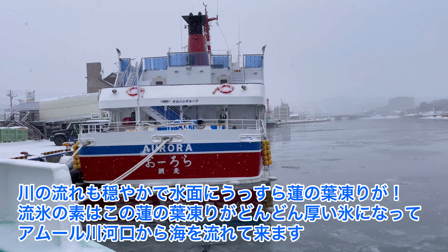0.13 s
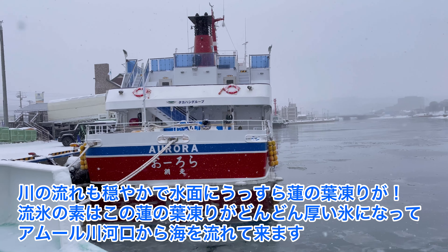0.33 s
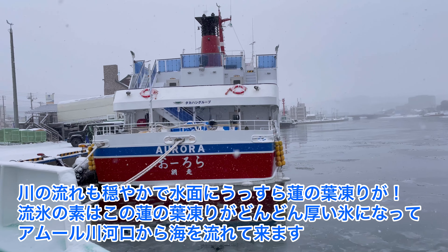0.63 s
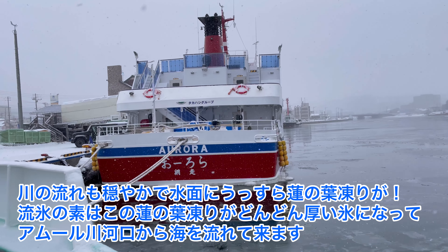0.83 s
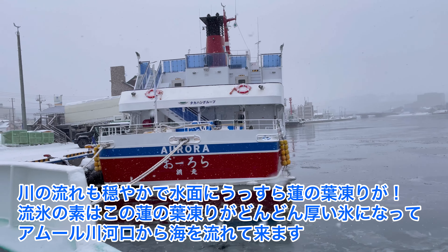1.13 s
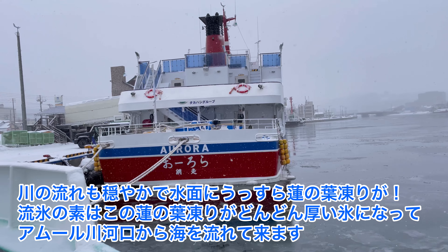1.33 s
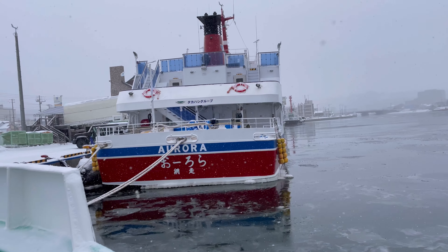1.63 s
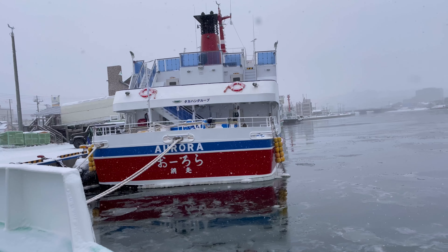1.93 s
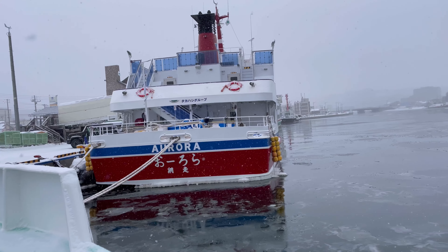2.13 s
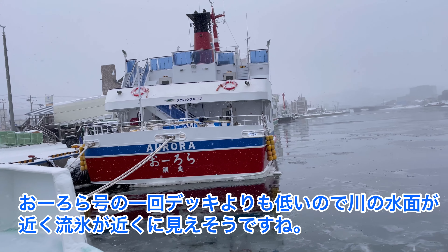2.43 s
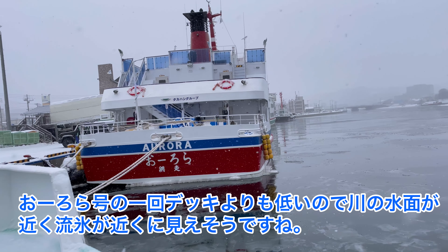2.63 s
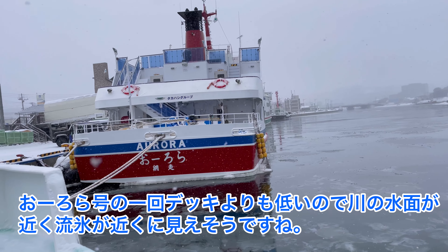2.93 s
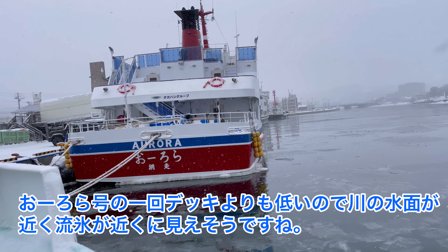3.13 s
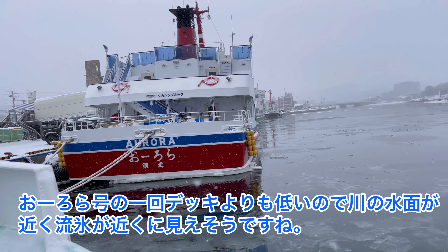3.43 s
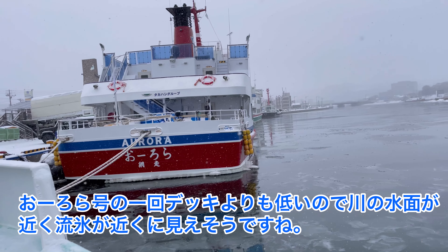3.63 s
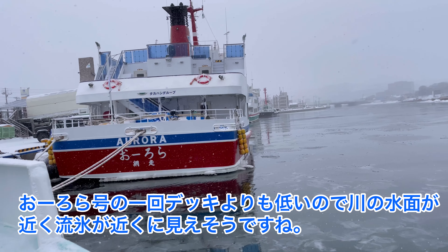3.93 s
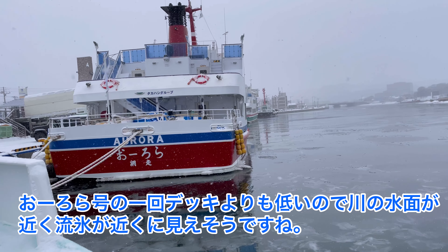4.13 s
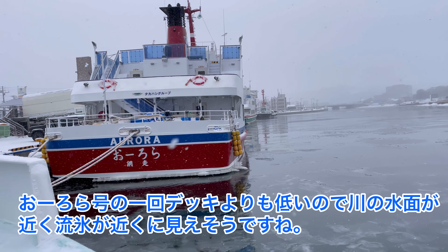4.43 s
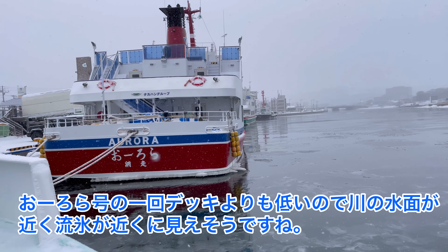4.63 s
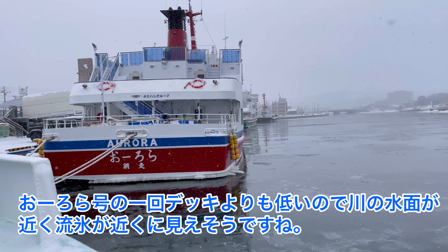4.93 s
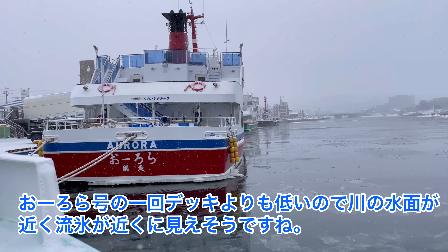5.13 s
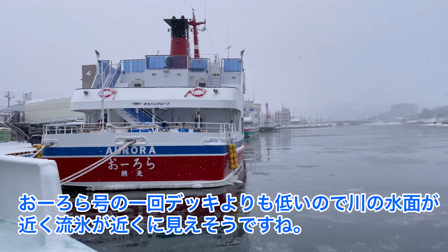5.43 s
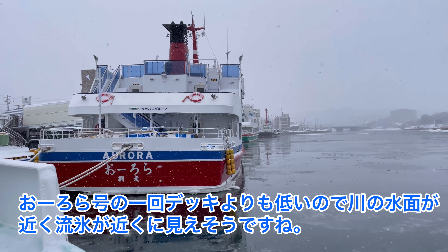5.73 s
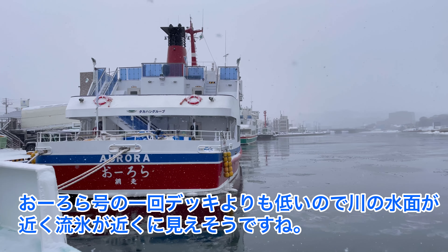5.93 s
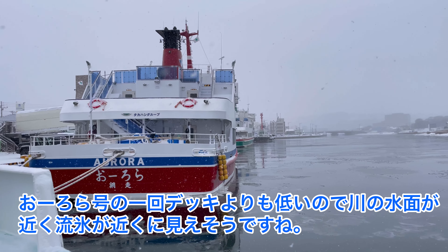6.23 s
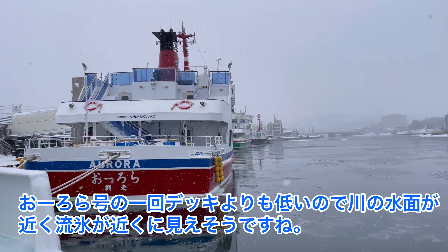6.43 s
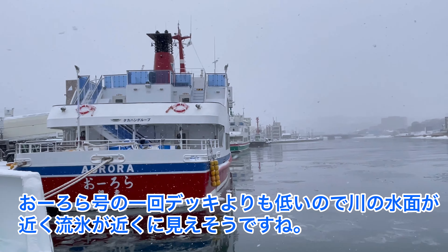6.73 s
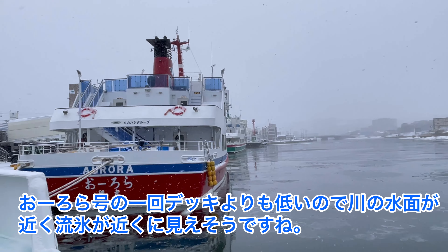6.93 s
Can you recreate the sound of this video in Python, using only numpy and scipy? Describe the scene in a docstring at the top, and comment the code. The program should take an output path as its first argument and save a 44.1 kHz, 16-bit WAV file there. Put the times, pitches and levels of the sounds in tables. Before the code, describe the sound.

A ship's diesel drones loud and low under a broad rushing roar of exhaust and wash, with wavering whines and tiny metallic ticks.

```python
"""A diesel fires evenly under the open deck of a ship under way, among blower hum, droning ducts and wind.
Exhaust roar and wash are coloured noise that swells in short surges and sets hull and pipes singing.
A low whine of the blower wavers as a tone; higher whines are narrow bands of noise. A loose metal
fitting rings its modes when knocked; wind is lumpy low noise. All reaches a microphone with two ports,
which share sounds to a degree that depends on pitch.
"""
import sys
import numpy as np
from scipy import signal
from scipy.fft import rfft, irfft, next_fast_len
from scipy.io import wavfile

SR = 44100
rng = np.random.default_rng(int(sys.argv[2]) if len(sys.argv) > 2 else 0)


def generate_wav(sig):
    """Save sig (samples, or channels by samples) to the path in sys.argv[1] as 16-bit PCM at SR."""
    pcm = np.round(np.clip(np.atleast_2d(sig).T, -1, 1) * 32767).astype(np.int16)
    wavfile.write(sys.argv[1], SR, pcm)


N = 312669   # length in samples
# All levels in dB are relative: trims, port gaps and the microphone's gain come on top.


def amp(db):
    """dB to gain."""
    return 10 ** (np.asarray(db) / 20)


def rms_one(x):
    """Scale to rms 1."""
    return x / np.sqrt(np.mean(x ** 2) + 1e-20)


def in_time(rows):
    """Columns of a curve in time, one value a sample."""
    start_s, *columns = np.transpose(rows)
    return [np.interp(np.arange(N) / SR, start_s, column) for column in columns]


def at_hz(rows, hz):
    """Columns of a spectrum table, read on a log-frequency axis."""
    table_hz, *columns = np.transpose(rows)
    return [np.interp(np.log(hz + 1), np.log(table_hz), column) for column in columns]


def drift(rate_hz):
    """Slow random wander of spread 1: noise at every 40th sample, twice low-passed."""
    r = np.exp(-80 * np.pi * rate_hz / SR)
    noise = rng.standard_normal(N // 40 + 2002)
    slow = signal.lfilter([1], [1, -2 * r, r * r], noise)[2000:]   # drop the run-in
    return np.interp(np.arange(N) / 40, np.arange(len(slow)), rms_one(slow - slow.mean()))


def turns(hz):
    """Running phase in radians of a frequency curve, from a random start."""
    return 2 * np.pi * (np.cumsum(hz) / SR + rng.random())


def band_noise(noise, low_hz, high_hz):
    """Noise through a gentle band-pass."""
    return signal.sosfilt(signal.butter(2, [low_hz, high_hz], "band", fs=SR, output="sos"), noise)


# The microphone's two ports: pitch_hz, likeness (0-1), left_over_right_db
PORT_MATCH = [(40, 0.8, 0.5), (120, 0.7, 6), (213, 0.63, 3.5), (293, 0.77, 1.5), (387, 0.32, 3),
              (540, 0.58, 5), (975, 0.42, 5.5), (1500, 0.02, 5.5), (1830, 0.24, 4), (2440, 0.37, 6.5),
              (3800, 1, 4), (4500, 0.02, 8), (5460, 0.2, 9.5), (7550, 0.7, -0.5), (7600, 1, 3.5),
              (9570, 1, -1.5), (10800, 0.02, 2), (12600, 0.7, -1.5)]
# Phase between the ports: pitch_hz, left_lead_rad
PORT_LEAD = [(0, 0), (260, 0.3), (690, 2.0), (950, 2.3), (1550, 2.5), (1810, -0.4), (2150, 0.2),
             (2500, 0.7), (3620, 1.2), (4390, 1.1), (4650, 1.3), (5340, 0.8), (5680, -1.4), (7240, -1.9),
             (7670, -3.0), (9560, -3.3), (11600, -5.3), (12000, -6.0), (12500, -6.3), (14600, -6.3)]


def ports(direct, field):
    """The right port hears direct sound shifted in phase and level, and shares only part of the noise field."""
    size = next_fast_len(N + 4096)
    hz = np.arange(size // 2 + 1) * SR / size
    alike, gap_db = at_hz(PORT_MATCH, hz)
    alike = np.clip(alike, 0, 1)
    lead_rad = np.interp(hz, *np.transpose(PORT_LEAD))
    near, far = rfft(field, size)
    shared = np.exp(-1j * lead_rad) * (rfft(direct, size) + alike * near)
    right = amp(-gap_db) * (shared + np.sqrt(1 - alike ** 2) * far)
    return np.array([direct + field[0], irfft(right, size)[:N]])


ROAR_DB = -26   # at the mean surge
# Roar below this pitch follows the rumble curve, by this share
RUMBLE_TOP_HZ, RUMBLE_FOLLOWS = 760, 0.82
SURGE_FLICKER_DB, SPRAY_FLICKER_DB, FLICKER_RATE_HZ = 0.55, 1.1, 15
# Surges of exhaust and wash, used as swings about the mean: start_s, upper_middle_db, treble_spray_db
SURGES = [(0.0, -40, -63), (0.86, -39.5, -62), (0.95, -37.5, -59.5), (1.06, -38.5, -62),
          (1.13, -39.5, -59.5), (1.3, -39, -60.5), (1.45, -39.5, -62.5), (1.54, -40.5, -62.5),
          (1.62, -39, -62.5), (2.13, -41.5, -63.5), (2.22, -37, -60.5), (2.4, -40, -61.5),
          (2.51, -37.5, -59.5), (2.66, -40, -65.5), (2.95, -39.5, -60), (3.27, -39.5, -63.5),
          (3.37, -39.5, -63.5), (3.52, -41, -63.5), (3.6, -39, -60), (3.69, -38, -63), (3.77, -37, -61),
          (3.88, -38, -60.5), (4.05, -40, -62), (4.14, -36, -59), (4.23, -40, -64.5), (4.51, -39.5, -63),
          (4.6, -42.5, -68), (4.77, -40, -62), (5.3, -39.5, -63.5), (5.37, -38.5, -63), (5.45, -39.5, -64),
          (5.54, -41.5, -65), (5.6, -37, -60.5), (5.71, -36, -57), (5.76, -39, -64), (6.05, -41, -64.5),
          (6.25, -40.5, -63.5), (6.33, -38.5, -59.5), (6.45, -40, -62.5), (6.78, -41.5, -63.5),
          (6.88, -38.5, -59), (6.96, -42, -65), (7.02, -40, -61.5)]
# Rumble in the low middle, used as swings about the mean: start_s, level_db
RUMBLE_CURVE = [(0.0, -22.5), (1.0, -22), (1.15, -20), (1.33, -21), (1.51, -23), (2.32, -22), (2.41, -25.5),
                (2.51, -18), (2.63, -25), (3.16, -19.5), (3.38, -24.5), (3.42, -19), (3.61, -24),
                (3.63, -18.5), (3.83, -20), (4.77, -23.5), (4.93, -18), (4.97, -22), (5.52, -21.5),
                (5.54, -27.5), (5.65, -15), (5.77, -22), (6.18, -24), (6.24, -20), (6.81, -25),
                (6.87, -21.5), (6.99, -22.5), (7.05, -22)]


def surges():
    """Swell of the upper middle, and the levels of rumble and spray; one fast flicker moves surge and spray."""
    surge_db, spray_db = in_time(SURGES)
    flicker = drift(FLICKER_RATE_HZ)
    surge_db = surge_db - surge_db.mean() + SURGE_FLICKER_DB * flicker
    spray_db = spray_db + SPRAY_FLICKER_DB * flicker
    rumble_db, = in_time(RUMBLE_CURVE)
    rumble_db = ROAR_DB + RUMBLE_FOLLOWS * (rumble_db - rumble_db.mean())
    return surge_db, rumble_db, spray_db


# Colour of the exhaust and wash roar: pitch_hz, density_db (per Hz)
ROAR_COLOUR = [(25, -35), (60, -5), (130, -1), (210, 2.5), (290, -6), (420, -1.5), (800, -6.5),
               (1400, -16.5), (2000, -22.5), (5300, -37.5), (5500, -42.5), (7500, -45.5), (9800, -47),
               (11500, -51), (12600, -55.5), (13800, -65), (15000, -70.5)]


def roar(roar_db, rumble_db, spray_db):
    """Two unrelated noise fields in half-octave bands: bass steady, middle surging, top following the spray."""
    mean_db = roar_db.mean()
    out, edges_hz = 0, 24 * 2 ** np.arange(0, 9.6, .5)
    white = rng.standard_normal((2, 2, N))   # neighbouring bands take different noise
    for k, (low, high) in enumerate(zip(edges_hz, edges_hz[1:])):
        band = band_noise(white[k % 2], low, high)
        reach = np.clip(np.log2(low / 110) / 1.8, 0, 1.2)   # how far surges move this band
        spray = np.clip(np.log2(low / 2800) / 1.8, 0, 1)   # share of the spray in this band
        middle_db = rumble_db if low < RUMBLE_TOP_HZ else roar_db
        swell_db = (1 - spray) * (middle_db - mean_db) + spray * (spray_db - spray_db.mean())
        out = out + amp(reach * swell_db + 1.47 * drift(11.2)) * band
    size = next_fast_len(N)
    colour = amp(at_hz(ROAR_COLOUR, np.arange(size // 2 + 1) * SR / size)[0])
    coloured = irfft(rfft(out, size) * colour, size)[:, :N]
    return amp(mean_db + 6.5) * rms_one(coloured)


def singing(modes, level_db):
    """Two fields of noise go twice through each narrow resonance; each resonance flickers on its own."""
    out, white = 0, rng.standard_normal((2, N + SR))   # one second of run-in
    for hz, width_hz, db, right_db in modes:
        r = np.exp(-np.pi * width_hz / SR)
        poles = [1, -2 * r * np.cos(2 * np.pi * hz / SR), r * r]
        once = signal.lfilter([1, 0, -1], poles, white)
        tone = signal.lfilter([1, 0, -1], poles, once)[:, SR:]
        flicker = amp(2.2 * drift(3))
        heard = ports(np.zeros(N), rms_one(tone)) * amp([[0], [right_db]])
        out = out + amp(db) * flicker * heard
    return amp(level_db) * out


# Hull and pipe resonances: pitch_hz, width_hz (of one pass), level_db (against the roar),
# right_db (on top of the port gap)
HULL_AND_PIPES = [(192, 10, -7, 0), (204, 14, -10, 0.5), (238, 12, -8, 0), (254, 16, -3, -3),
                  (271, 16, -2, 0), (336, 16, -1, -3), (362, 20, -3, -2), (405, 34, -3, 4),
                  (445, 28, -4, -2), (526, 15, -6.5, 0.5), (541, 13, -7, 0.5), (640, 32, -14, -1.5),
                  (686, 14, -14, 2), (780, 45, -8.5, -1), (1022, 50, -13, 0), (1097, 26, -16, 0),
                  (1250, 110, -11.5, 1.5), (1355, 80, -10.5, -2), (1445, 48, -17, -0.5),
                  (1615, 40, -21.5, -1.5), (14500, 300, -55.5, -0.5)]


def hull_and_pipes(roar_db, rumble_db):
    """Resonances set singing by the roar: the low ones swell with the rumble, the others with the surge."""
    low = [mode for mode in HULL_AND_PIPES if mode[0] < RUMBLE_TOP_HZ]
    high = [mode for mode in HULL_AND_PIPES if mode[0] >= RUMBLE_TOP_HZ]
    return singing(low, rumble_db) + singing(high, roar_db)


# Wind on the microphone: start_s, level_db
WIND_CURVE = [(0.0, -15), (0.85, -25), (1.12, -21), (1.3, -34), (2.29, -41), (2.63, -35), (4.0, -41),
              (6.5, -49.5), (7.09, -44)]


def wind():
    """Low lumpy buffeting, mostly shared by both ports and stronger at the left."""
    level_db, = in_time(WIND_CURVE)
    shared, own = rng.standard_normal(N), rng.standard_normal((2, N))
    lumps = band_noise(shared + 0.16 * own, 44, 72)
    return amp(level_db - 11.5) * rms_one(lumps) * amp([[1.5], [-1.5]])


# Brief airy puffs straight ahead: start_s, decay_s (Gaussian width), level_db
PUFF_TIMES = [(.16, 0.024, -53), (.435, 0.071, -51.5), (.72, 0.035, -58), (1.03, 0.021, -57),
              (1.575, 0.083, -59)]


def puffs():
    """Bright noise that rises in about 5 ms and fades as a bell curve, the same at both ports."""
    t = np.arange(N) / SR
    shape = 0
    for start_s, decay_s, db in PUFF_TIMES:
        rise = np.clip((t - start_s) / 0.0051, 0, 1)
        fade = np.exp(-(np.maximum(t - start_s, 0) / decay_s) ** 2 / 2)
        shape = shape + amp(db) * rise * fade
    return shape * rms_one(band_noise(rng.standard_normal(N), 3900, 10000))


def ducts(tones, level_db):
    """Air columns whose pitch and level waver with the flow."""
    flutters = amp([1.3 * drift(3) for _ in tones])
    drone = 0
    for flutter, (hz, spread_hz, db) in zip(flutters, tones):
        drone = drone + amp(db) * flutter * np.sin(turns(hz + spread_hz * drift(3.74)))
    return amp(level_db) * drone


BLOWER_HZ = 91.4
# Tones of the blower blades: pitch_multiple, level_db
BLADES = [(1, -6), (2, 1), (3, -18), (4, -15), (6, -21), (7, -20)]


def blower(level_db):
    """Blade tones on one pitch that turbulence pushes about; each tone flutters in level on its own."""
    phase = turns(BLOWER_HZ * (1 + 0.00648 * drift(3.71)))
    hum = 0
    for multiple, db in BLADES:
        flutter = amp(db + 1.5 * drift(2.6))
        hum = hum + flutter * np.sin(multiple * phase + 2 * np.pi * rng.random())
    return amp(level_db + 4.5) * hum


# Ventilation: start_s, blower_db, low_duct_db, high_duct_db
VENTILATION = [(0.0, -27.5, -30, -14.5), (0.29, -24.5, -20, -33.5), (0.75, -27, -36, -17),
               (1.0, -21.5, -22, -23), (1.2, -27, -20.5, -15.5), (1.64, -25, -26.5, -31.5),
               (2.0, -24.5, -22, -22), (2.47, -19.5, -27, -33), (2.76, -28, -30, -25.5),
               (3.2, -23.5, -18.5, -19.5), (3.35, -23, -32, -17), (3.55, -29.5, -19, -22),
               (4.03, -20.5, -22, -29), (4.23, -25, -35.5, -24.5), (4.4, -23.5, -33.5, -22),
               (4.8, -28, -27, -21.5), (5.1, -25, -22, -30.5), (5.5, -25.5, -23.5, -24.5),
               (5.7, -23.5, -33, -21.5), (6.0, -28.5, -27, -20), (6.4, -19.5, -22, -31),
               (6.61, -31, -19, -22), (6.85, -19, -25, -34), (7.05, -39.5, -18, -23)]
# Duct tones, a low and a high pair: pitch_hz, pitch_spread_hz, level_db (against their curve)
LOW_DUCTS = [(84.7, 1.35, -0.5), (88.57, 1.453, 1)]
HIGH_DUCTS = [(171.1, 1.5, -2.5), (176.8, 1.0, -0.5)]


def ventilation():
    """Blower hum and the two pairs of droning ducts, each on its own level curve."""
    blower_db, low_db, high_db = in_time(VENTILATION)
    return blower(blower_db) + ducts(LOW_DUCTS, low_db) + ducts(HIGH_DUCTS, high_db)


# High whines: pitch_hz, width_hz (of one pass), level_db, right_db (on top of the port gap)
HIGH_WHINE_MODES = [(2138, 70, -4, -1.5), (2405, 110, -0.5, -0.5), (2505, 75, -2, -1.5),
                    (2890, 50, -11, -1), (3120, 50, -11, -1), (4830, 60, -16, 6)]


def high_whines(surge_db):
    """Narrow bands of noise that swell 1.4 times as far in dB as the surge."""
    return singing(HIGH_WHINE_MODES, -48 + 1.4 * surge_db)


# The shrill whine comes and goes: start_s, level_db
SHRILL_CURVE = [(0.0, -54), (0.9, -55), (0.98, -45), (1.1, -54), (1.7, -54), (1.82, -45), (1.95, -55),
                (2.5, -50), (3.16, -53), (3.28, -41), (3.4, -58), (4.04, -53), (4.16, -42), (4.24, -53),
                (4.67, -57), (4.97, -47), (5.1, -53), (5.32, -48), (5.52, -58), (5.6, -44), (5.7, -41),
                (5.76, -55), (7.05, -55)]
# Its resonance: pitch_hz, width_hz (of one pass), level_db, right_db (on top of the port gap)
SHRILL_MODE = [(3436, 75, -3.5, -.5)]


def shrill_whine():
    """One narrow band of noise on its own level curve."""
    return singing(SHRILL_MODE, *in_time(SHRILL_CURVE))


# The low whine comes and goes: start_s, level_db
LOW_WHINE_CURVE = [(0.02, -45), (0.17, -42), (0.72, -44), (1.17, -34), (1.39, -43.5), (2.15, -37.5),
                   (2.33, -33), (2.44, -44), (2.56, -31), (2.77, -53), (2.99, -27), (3.23, -42),
                   (3.37, -44), (3.48, -29.5), (3.62, -42.5), (4.73, -46.5), (4.87, -27.5), (4.98, -47),
                   (5.3, -42), (5.41, -32), (5.55, -46), (6.34, -43.5), (6.41, -32), (6.51, -54),
                   (7.04, -47)]


def low_whine():
    """A high harmonic of the blower that wavers in pitch and flutters in level."""
    level_db, = in_time(LOW_WHINE_CURVE)
    flutter = amp(3 * drift(11))
    pitch_hz = 1010 * (1 + .007 * drift(6.0))
    return amp(level_db + 7.0) * flutter * np.sin(turns(pitch_hz))


# Modes of the loose fitting: pitch_hz, t60_s, touch_db (faint touches)
FITTING_MODES = [(8753, .05, -57), (7250, .014, -66), (11780, .035, -66), (10400, .004, -64)]
# Knocks on it: start_s, first_mode_db, second_mode_db
FITTING_KNOCKS = [(0.168, -39, -40), (0.578, -53, -39), (0.649, -37, -55), (1.204, -44, -52),
                  (1.545, -37, -44), (1.751, -50, -41), (2.359, -47, -44), (3.462, -32, -58),
                  (3.721, -39, -40), (4.408, -42, -46), (4.759, -52, -38), (4.915, -51, -39),
                  (5.683, -40, -36), (6.427, -48, -38)]


def fitting():
    """Knocks and faint random touches ring metal modes that die away exponentially."""
    start_s, first_db, second_db = np.transpose(FITTING_KNOCKS)
    at = (start_s * SR).astype(int)
    top_db = first_db - 13 + 4.0 * rng.standard_normal(len(at))
    crack_db = second_db - 3.0   # the shortest mode
    touches = rng.random(N) < 45.0 / SR   # 45 a second on average
    out = np.zeros(N)
    for peak_db, (hz, t60_s, touch_db) in zip([first_db, second_db, top_db, crack_db], FITTING_MODES):
        clicks = touches * amp(touch_db + 2.3 * rng.standard_normal(N)) + 1e-18
        clicks[at] += amp(peak_db)
        r, w = amp(-60 / (t60_s * SR)), 2 * np.pi * hz / SR
        out += signal.lfilter([0, np.sin(w)], [1, -2 * r * np.cos(w), r * r], clicks)
    return out


CYLINDERS = 12
# Main engine: start_s, firing_hz, level_db
ENGINE_CURVE = [(0, 77.64, -23), (1.5, 77.37, -20.5), (2.4, 78, -23.5), (3.5, 78.03, -22),
                (5.2, 78.27, -21.5), (7.09, 78.33, -23.5)]
# Engine lines: cycle_multiple (of the cylinder cycle), level_db (against the engine curve)
ENGINE_LINES = [(9, -22.5), (10, -21), (11, -24.5), (12, -1), (15, -16.5), (18, -18), (24, -11.5)]


def engine():
    """Evenly firing cylinders: a clean firing line, its octave and weak lines from unequal cylinders."""
    firing_hz, level_db = in_time(ENGINE_CURVE)
    lines = 0
    for multiple, db in ENGINE_LINES:
        flutter = amp(db + 1.0 * drift(5.0))
        lines = lines + flutter * np.sin(turns(firing_hz * multiple / CYLINDERS))
    return np.sqrt(2) * amp(level_db + 3.0) * lines


def scene():
    """Machines, noise field and wind at the two ports; the surge drives roar, resonances and high whines."""
    surge_db, rumble_db, spray_db = surges()
    roar_db = ROAR_DB + surge_db
    machines = engine() + ventilation() + low_whine() + fitting()
    heard = ports(machines, roar(roar_db, rumble_db, spray_db))
    tones = hull_and_pipes(roar_db, rumble_db) + shrill_whine() + high_whines(surge_db)
    return heard + tones + puffs() + wind()


def record(dry):
    """The microphone rounds the peaks and cuts the top steeply above 15050 Hz."""
    rounded = 1.697 * np.tanh(dry / 1.32)
    return signal.sosfilt(signal.ellip(10, 1, 70, 15050, fs=SR, output="sos"), rounded)


dry = scene()
out = record(dry)
generate_wav(out)
```